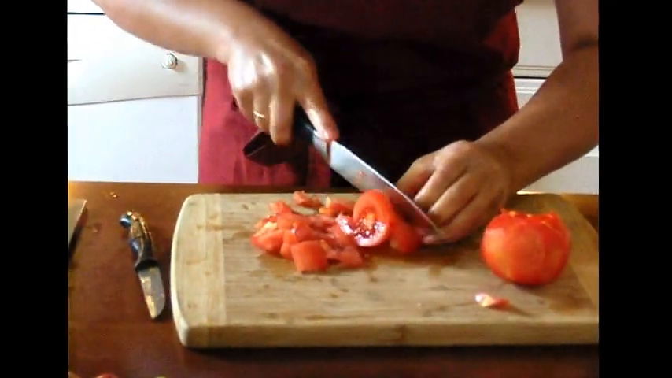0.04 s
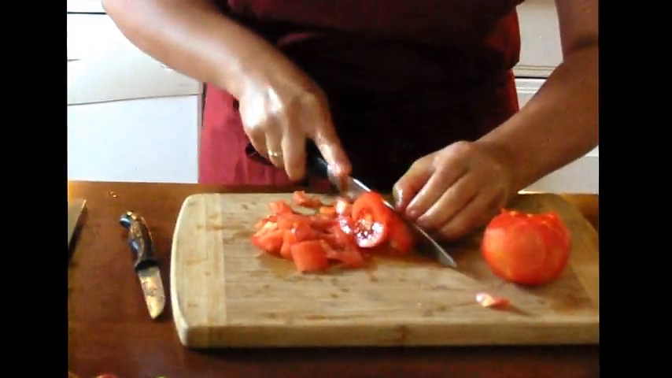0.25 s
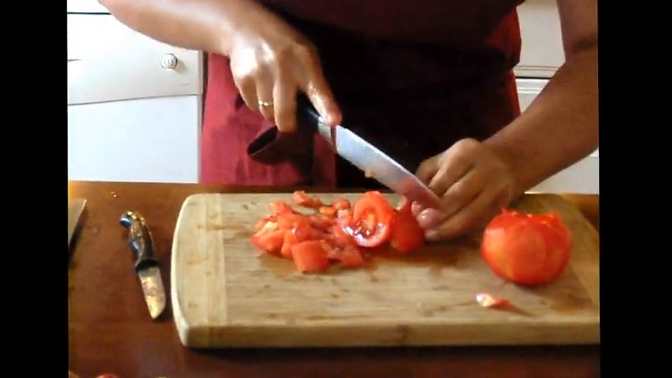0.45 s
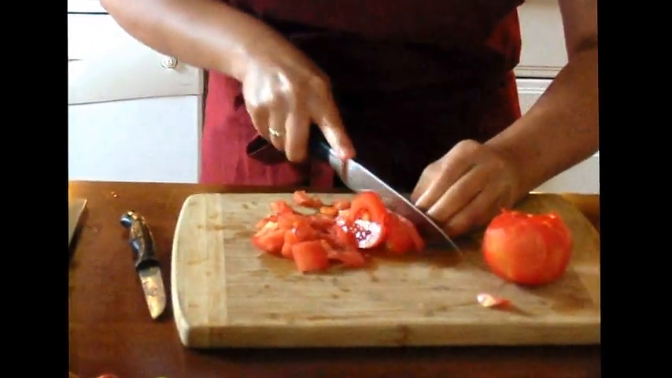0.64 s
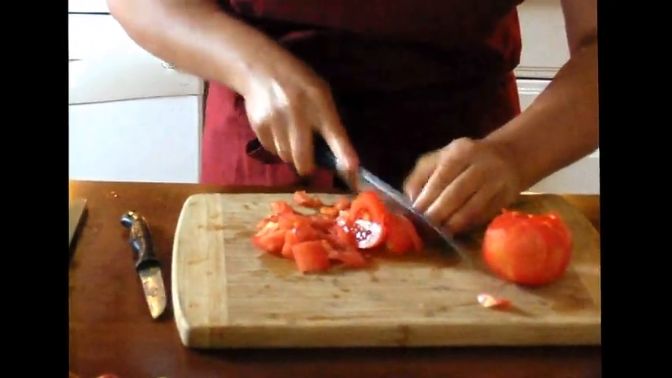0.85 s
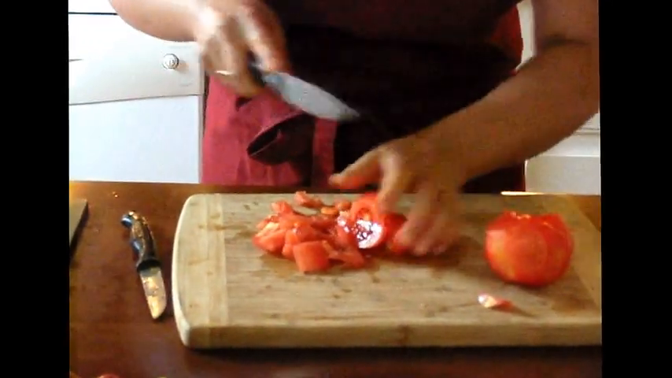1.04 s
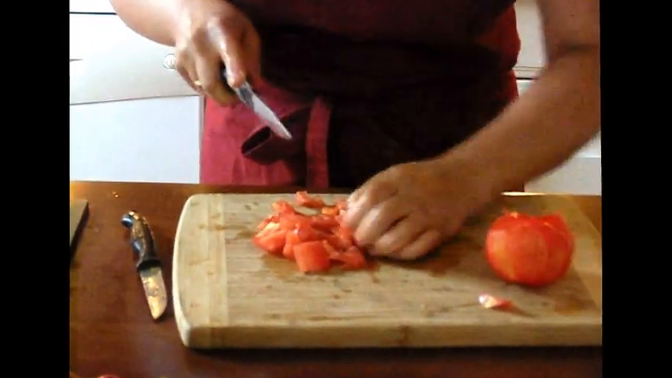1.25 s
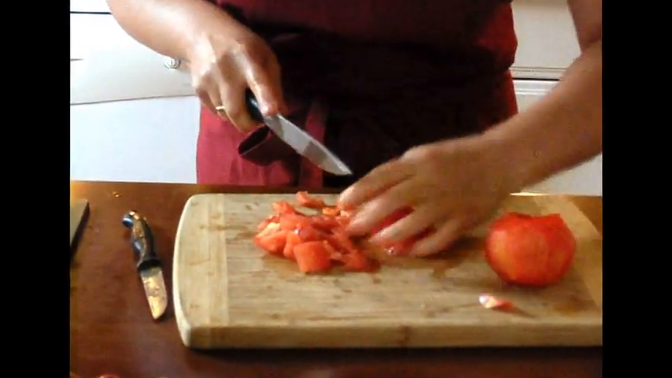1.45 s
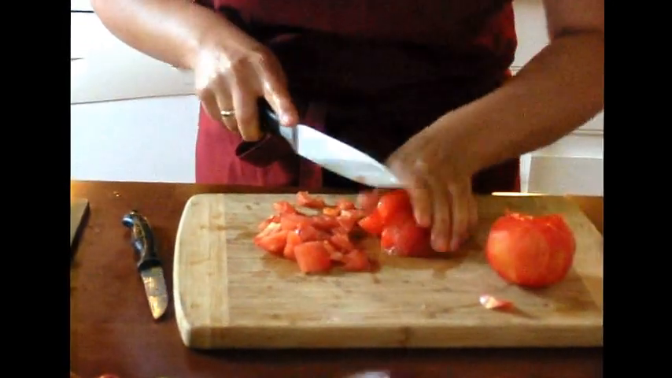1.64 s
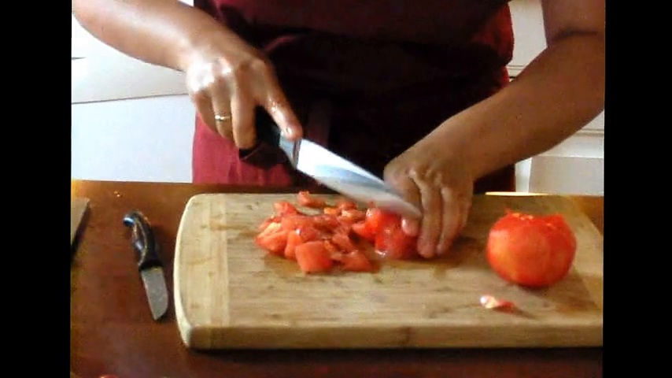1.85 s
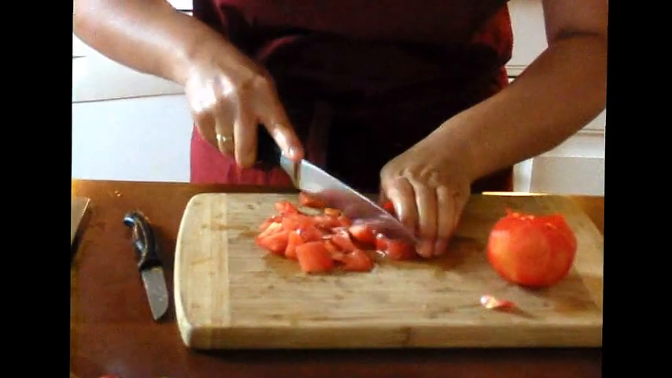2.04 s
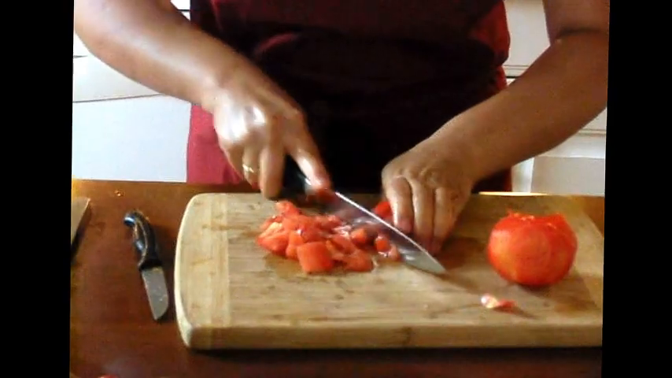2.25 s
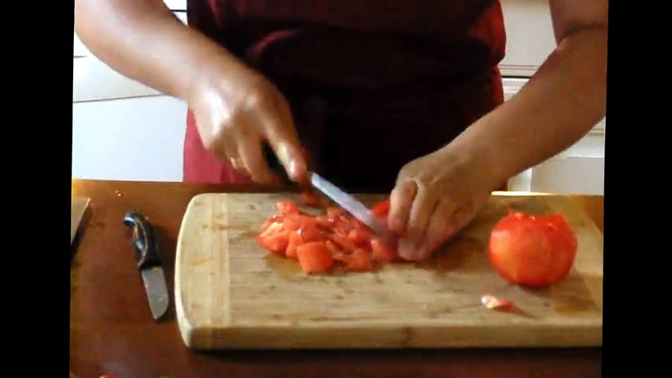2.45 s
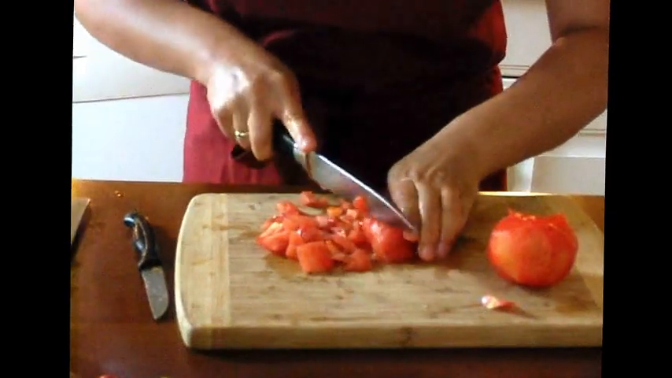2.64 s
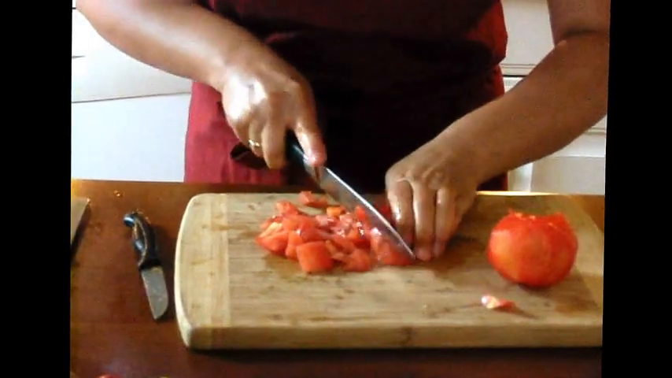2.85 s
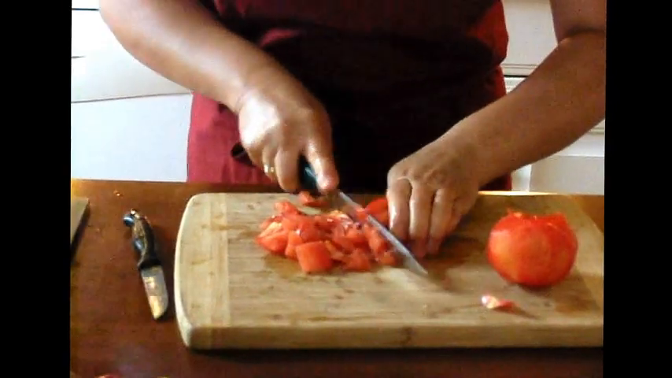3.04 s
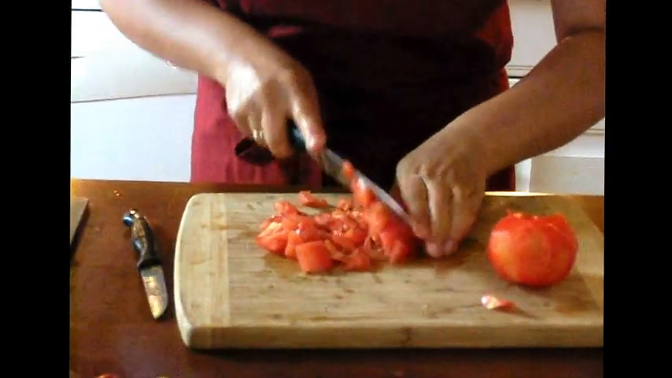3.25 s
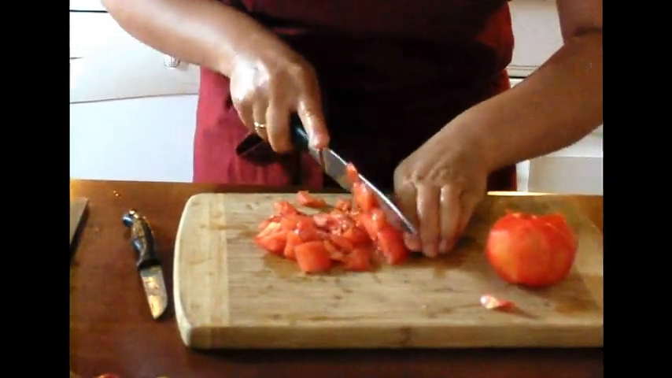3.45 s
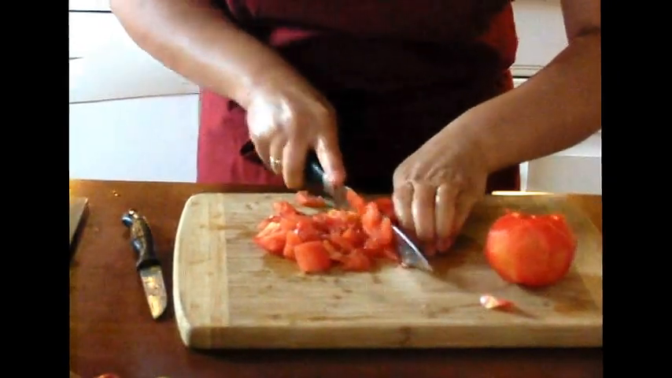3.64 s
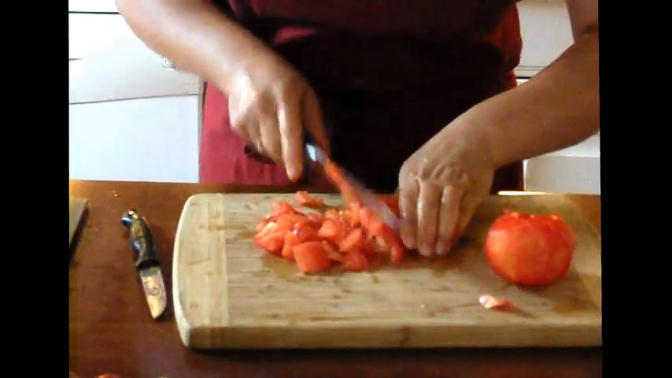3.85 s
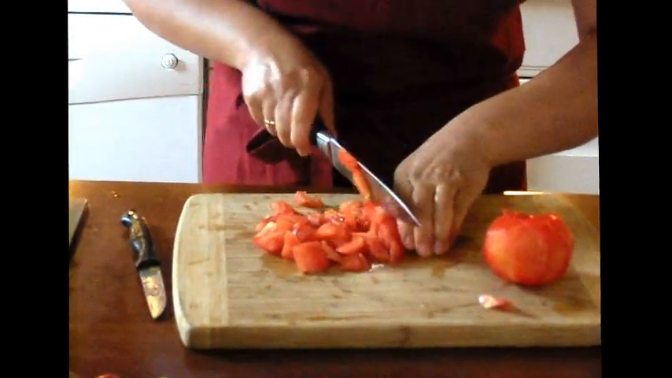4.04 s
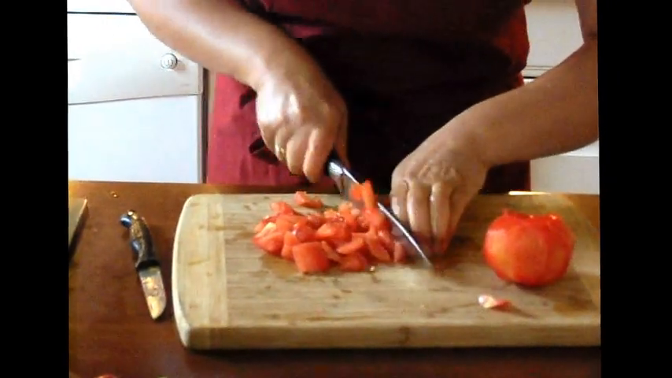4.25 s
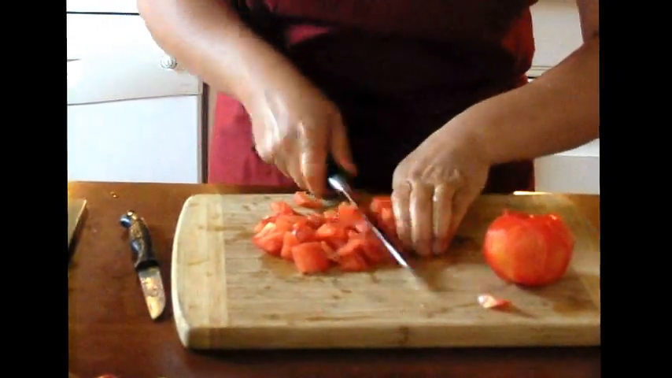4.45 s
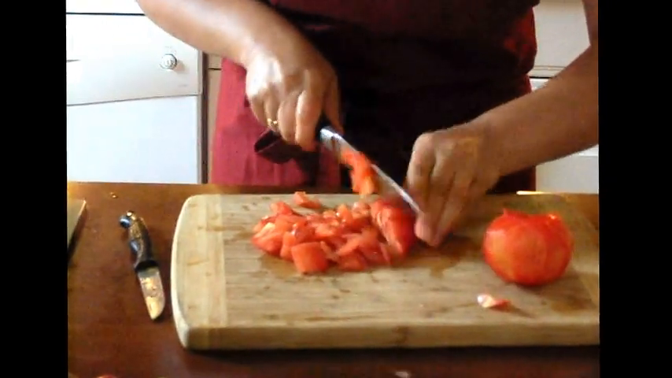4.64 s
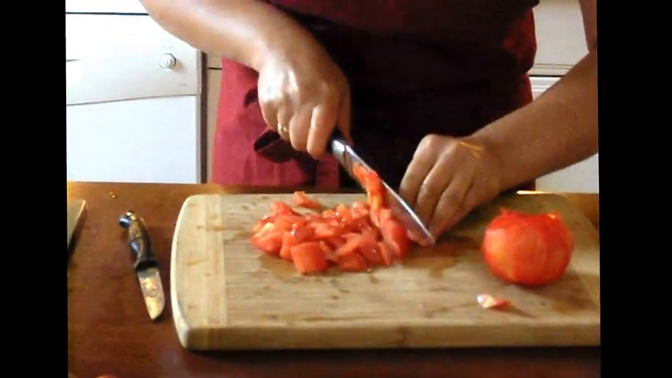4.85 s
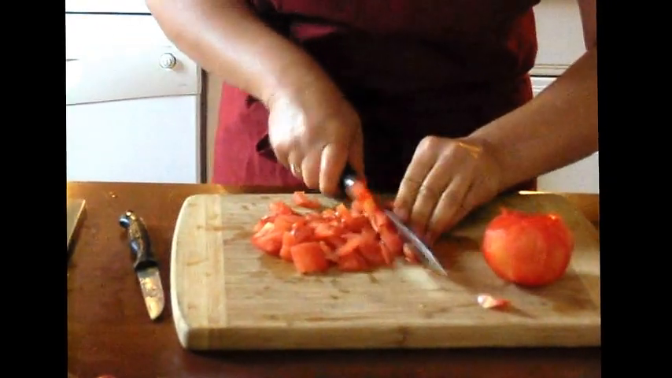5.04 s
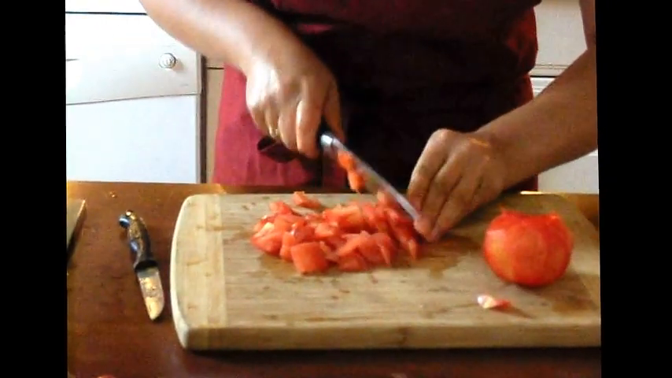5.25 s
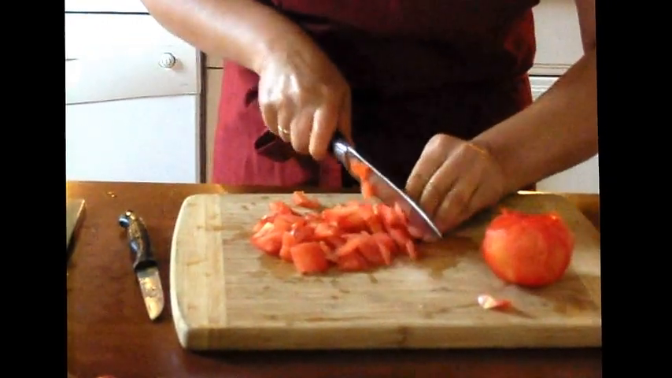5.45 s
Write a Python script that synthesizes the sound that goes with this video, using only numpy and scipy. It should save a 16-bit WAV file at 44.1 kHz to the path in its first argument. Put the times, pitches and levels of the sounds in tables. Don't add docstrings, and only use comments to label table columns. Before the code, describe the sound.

A knife dices juicy tomatoes on a thick wooden board, one very loud knock then softer uneven ones, with wet squishes in a ringing kitchen.

```python
import sys
import numpy as np
from scipy import signal
from scipy.fft import rfft, irfft
from scipy.io import wavfile
from scipy.ndimage import uniform_filter1d

SR = 44100
rng = np.random.default_rng(int(sys.argv[2]) if len(sys.argv) > 2 else 0)


def master(y):
    cut = np.clip(np.atleast_2d(y).T, -1, 1)
    pcm = np.round(cut * 32767)
    wavfile.write(sys.argv[1], SR, pcm.astype(np.int16))


def amplitude_ratio(level_db):
    exponent = np.asarray(level_db, float) / 20
    return 10 ** exponent


N = 242682

# (time [s], peak [dB], contact [ms], crack re peak [dB], rattle re peak [dB])
KNOCKS = [
    (0.2231, 0.5, 0.21, -33, -11),
    (.807, -12.5, 0.3, -26, -22.5),
    (2.329, -22, 0.59, -27, -18),
    (3.0263, -13.5, 0.15, -26, -15),
    (3.7038, -10, 0.39, -21.5, -20.5),
    (4.3893, -27, 0.2, -17, -2),
    (5.0828, -25.5, 0.51, -16, -18),
]


def evened(x):
    return x / np.sqrt(np.mean(x ** 2) + 1e-20)


def read(points, hz):
    f, value = np.transpose(points)
    return np.interp(np.log(hz + 1), np.log(f + 1), value)


def add(mix, s, sound):
    part = mix[round(s * SR):][:len(sound)]
    part += sound[:len(part)]


def colour(x, points):
    gain = amplitude_ratio(read(points, np.fft.rfftfreq(len(x), 1 / SR)))
    return evened(irfft(rfft(x) * gain, len(x)))


def resonate(x, hz, width):
    turn = np.exp(2j * np.pi * np.cumsum(hz * np.ones(len(x))) / SR)
    r = np.exp(-np.pi * width / SR)
    return evened((turn * signal.lfilter([1], [1, -2 * r, r * r], x / turn)).real)


def ring(modes, contact_ms, spread_ms=0.94):
    t = np.arange(3000)[:, None] / SR
    hz, width, db = np.transpose(modes)
    width = np.maximum(width, .06 * hz)
    sign = (-1) ** np.arange(len(hz))
    decay = np.exp(-np.pi * width * t)
    free = (sign * amplitude_ratio(db) * width / hz * decay * np.sin(2 * np.pi * hz * t)).sum(axis=1)
    free *= 1 - np.exp(-(t[:, 0] / (spread_ms / 1000)) ** 2)
    push = np.sin(np.pi * np.clip(t[:200, 0] / (contact_ms / 1000), 0, 1)) ** 2
    sound = np.diff(np.convolve(free, push)[:len(t)], prepend=0)
    return sound / abs(sound).max()


def board():
    # (frequency [Hz], width [Hz], level [dB])
    far_end = [(192, 55, -16), (400, 210, -15.5), (546, 240, -4.5), (781, 19, -0.5), (907, 130, -4.5),
               (1500, 190, -1.5), (1870, 120, -8.5), (1990, 170, -1.5), (2503, 150, -2.5), (2930, 160, -2),
               (3413, 240, -3.5), (3900, 470, -6.5), (4740, 600, -13), (6150, 920, -31.5)]
    near_end = [(398, 68, -9.5), (540, 550, -9), (678, 106, 3), (1170, 67, -13), (1330, 67, -8.5),
                (1787, 240, -3), (2440, 150, -10.5), (2730, 730, -11), (3420, 590, -12)]
    middle = [(400, 50, -6.5), (623, 180, 0), (720, 125, 7.5), (1282, 150, -5.5), (1570, 510, 0),
              (2610, 260, -18.5)]
    centre = [(415, 270, -4.5), (644, 110, 3.5), (754, 98, 9), (1330, 210, 2), (1585, 110, 2.5),
              (1900, 1000, 9), (2770, 370, 2.5)]
    cushioned = [(450, 110, -6), (576, 500, -3), (741, 150, 2.5), (1390, 430, -8), (2760, 250, -6.5)]
    places = [far_end, near_end, middle, middle, centre, cushioned, cushioned]
    # (frequency [Hz], density [dB per Hz])
    crack_spectrum = [(1500, -41.5), (3200, -0.5), (6000, -12), (9000, -25.5), (15000, -26.5)]
    # (frequency [Hz], density [dB per Hz])
    rattle_spectrum = [(700, -13.5), (1150, -21), (1600, -8.5), (3200, -5), (4200, -1), (5500, -9.5),
                       (7000, -16), (10000, -35)]
    # (time [s], peak [dB], pitch [Hz], t60 [s])
    lifts = [
        (4.567, -46, 1990, 0.032),
        (5.1861, -49, 2930, 0.03),
    ]
    crack_s, rattle_s = .0006, 0.0044

    out = np.zeros(N)
    t = np.arange(800) / SR
    for (s, db, contact_ms, crack_db, rattle_db), modes in zip(KNOCKS, places):
        add(out, s, amplitude_ratio(db) * ring(modes, contact_ms))
        crack = colour(rng.standard_normal(len(t)), crack_spectrum) * t / .0003 * np.exp(-t / crack_s)
        add(out, s, amplitude_ratio(db + crack_db) * crack)
        rattle = colour(rng.standard_normal(len(t)), rattle_spectrum)
        rattle = rattle * t / rattle_s * np.exp(-2 * t / rattle_s)
        add(out, s, amplitude_ratio(db + rattle_db) * rattle)
    for s, db, hz, t60 in lifts:
        add(out, s, amplitude_ratio(db) * ring([(hz, 1.7 / t60, 0)], contact_ms=0.19))
    return out


def contacts():
    # (bite [s], hardest [s], bite level [dB], hardest level [dB], landing level [dB])
    cuts = [
        (0.106, 0.207, -77.5, -46.5, -35.5),
        (0.716, 0.8, -68, -55.5, -37.5),
        (2.23, 2.29, -62, -55.5, -45.5),
        (2.924, 2.968, -65, -50.5, -48.5),
        (3.576, 3.65, -56, -50, -48.5),
        (4.244, 4.308, -60, -48, -54),
        (4.925, 5.008, -65, -48, -55),
    ]
    # (whistle [Hz], whistle re hiss [dB], rub re hiss [dB])
    wet_slits = [(7300, -22.5, -1.5), (7700, -12, -1), (8200, -12, -1.5), (7060, -6, -1), (6960, -5, -4),
                 (7650, -22, 0), (5600, 2.5, 1)]
    # (start [s], length [s], hiss [dB], rub re hiss [dB])
    drags = [
        (0.22, 0.054, -48, 2),
        (0.8, 0.051, -54, 5.5),
        (2.335, 0.047, -53.5, 8.5),
        (3.025, 0.1, -66.5, 18.5),
        (3.715, 0.06, -59, -10),
        (4.389, 0.12, -64.5, 16),
        (5.073, 0.088, -58, 9),
    ]
    # (peak [s], rise [s], fall [s], hiss [dB], rub re hiss [dB])
    smears = [(.63, 0.036, 0.021, -66, -5.5), (.678, .04, 0.025, -63, 3), (1.318, 0.067, .15, -67, 4.5),
              (2.112, .035, .008, -67, 2.5), (2.2, 0.075, .02, -68, 3), (2.494, 0.042, 0.015, -55.5, 4.5),
              (2.89, 0.058, 0.059, -60.5, 1.5), (3.165, .06, .02, -64, 6),
              (3.214, 0.016, 0.036, -55.5, 4.5), (3.873, .024, 0.018, -57, 11.5),
              (4.566, 0.014, 0.035, -61.5, 10), (5.226, .04, 0.022, -58, 4.5)]
    bite_hz, land_hz = 8900, 6800
    sag_db = 6.5
    bite_rub_db, land_rub_db = 1, 4
    drag_fade_db, smear_edge_db = -11, -14.5
    smear_hz, smear_whistle_db = 6980, -9

    for (bite, hard, *db), (hz, wet_db, rub_db), knock in zip(cuts, wet_slits, KNOCKS):
        rub = (rub_db + bite_rub_db, rub_db, rub_db + land_rub_db)
        whistle_hz = (bite_hz, hz, min(hz, land_hz))
        whistle_db = (wet_db - sag_db, wet_db, wet_db - sag_db)
        yield (bite, hard, knock[0]), db, rub, whistle_hz, whistle_db
    for s, length, db, rub_db in drags:
        yield (s, s + length), (db, db + drag_fade_db), (rub_db,) * 2, (smear_hz,) * 2, (smear_whistle_db,) * 2
    for s, rise, fall, db, rub_db in smears:
        edge_db = db + smear_edge_db
        levels = (edge_db, db, edge_db)
        yield (s - rise, s, s + fall), levels, (rub_db,) * 3, (smear_hz,) * 3, (smear_whistle_db,) * 3


def strokes():
    # (frequency [Hz], density [dB per Hz])
    juice_spectrum = [(1760, -53.5), (3000, 4.5), (3480, -3.5), (3810, 3.5), (5070, 5.5), (6390, 7),
                      (9460, 6), (15600, -2.5), (16000, -25)]
    rub_spectrum = [(290, -5), (500, -5), (786, -4.5), (1120, -10.5), (1620, -7), (1910, -11), (2620, -8.5),
                    (5000, -14), (6500, -58), (11000, -120)]
    bite_s, stop_s = 0.0066, .003

    burst_db = 2.9 * np.minimum(rng.exponential(1, (3, N // 16 + 1)), 5)
    bursts = rng.standard_normal((3, N)) * amplitude_ratio(burst_db).repeat(16, 1)[:, :N]
    clumps_db = 0.57 * evened(uniform_filter1d(rng.standard_normal(N), 250))
    juice = colour(bursts[0], juice_spectrum)
    rub = colour(bursts[1], rub_spectrum)
    out = np.zeros(N)
    for s, *columns in contacts():
        at = np.arange(round(s[0] * SR), round(s[-1] * SR))
        db, rub_db, hz, whistle_db = (np.interp(at / SR, s, c) for c in columns)
        gate = np.clip(np.minimum((at / SR - s[0]) / bite_s, (s[-1] - at / SR) / stop_s), 0, 1)
        wet = juice[at] + amplitude_ratio(whistle_db) * resonate(bursts[2, at], hz, width=1600)
        out[at] += amplitude_ratio(db + clumps_db[at]) * (wet + amplitude_ratio(rub_db) * rub[at]) * gate
    return out


def pops():
    # (time [s], peak [dB], pitch [Hz], snap [dB])
    sticky_pops = [(.6784, -56, 7300, -12), (0.684, -50, 7150, 4), (.7367, -49, 6200, 0),
                   (1.3209, -51, 6090, -4), (2.1094, -64.5, 5160, -6.5), (2.1635, -57, 6660, -6),
                   (2.2563, -44, 9500, -6), (2.2917, -38, 9700, -9), (2.465, -46, 5300, -10),
                   (2.4984, -40, 8280, -12), (2.893, -45, 6900, 0), (3.1976, -42, 5260, 1),
                   (3.2103, -44, 5090, -13), (3.5778, -41, 9880, -8), (3.5944, -36, 9440, -10),
                   (3.6774, -32, 7700, -6), (3.837, -41, 6150, -5), (3.876, -42, 7500, -2),
                   (4.282, -35, 9700, 0), (4.568, -43, 5760, -6), (4.784, -53, 5800, -5),
                   (4.9337, -45, 5980, -4), (4.9696, -46, 6500, -8), (5.174, -38, 6000, -8),
                   (5.1913, -39, 7340, -16), (5.216, -41, 7820, -6), (5.2245, -40, 7760, -6),
                   (5.2324, -43, 5300, -9)]
    # (time [s], peak [dB], pitch [Hz])
    film_ticks = [(.388, -31.5, 6600), (.621, -54, 10500), (.735, -54, 12500), (1.681, -39, 10360),
                  (2.83, -50, 14300), (1.778, -53.5, 14300), (1.8302, -52.5, 9900), (2.5531, -51, 10700),
                  (3.204, -44, 9180), (3.2254, -53, 9310), (3.2909, -44, 12500), (3.8264, -50, 10200),
                  (4.2537, -50, 14800), (4.533, -35, 12200), (4.5384, -59, 9240)]
    pop_cycles, tick_cycles, tick_snap_db = 6, 2.5, -8

    out = np.zeros(N)
    t = np.arange(400) / SR
    rows = [(*p, pop_cycles) for p in sticky_pops]
    rows += [(*p, tick_snap_db, tick_cycles) for p in film_ticks]
    edges = rng.standard_normal((len(rows), len(t) + 2))
    for (s, db, hz, snap_db, cycles), edge in zip(rows, edges):
        tone = np.sin(2 * np.pi * hz * t) * np.exp(-t * hz / cycles)
        snap = amplitude_ratio(snap_db) * (edge[2:] - edge[:-2]) * np.exp(-t / .00035)
        add(out, s, amplitude_ratio(db) * (tone + snap) * (1 - np.exp(-t / 0.0001)))
    return out


def squeaks():
    # (time [s], length [s], frequency [Hz], width [Hz], level [dB])
    swells = [(0.178, 0.11, 2670, 500, -52), (2.25, 0.034, 9650, 1800, -59),
              (2.485, 0.015, 7300, 2200, -48.5), (2.599, 0.0055, 15000, 3500, -58),
              (2.486, 0.028, 3580, 900, -56), (3.59, .025, 9600, 1990, -56),
              (3.592, .012, 14300, 2500, -61), (3.61, 0.13, 1870, 450, -50), (3.68, 0.019, 7340, 1200, -49),
              (3.868, 0.011, 7350, 1500, -62), (4.252, .014, 14800, 2500, -52),
              (4.56, .012, 10500, 2000, -62), (4.562, 0.12, 2000, 450, -61),
              (3.204, 0.029, 9500, 1500, -62), (4.958, 0.035, 14000, 2500, -54),
              (5.216, 0.015, 14300, 3000, -66), (5.22, 0.053, 2203, 150, -56),
              (5.283, 0.044, 2183, 150, -65.5), (5.348, 0.0274, 2220, 150, -65.5)]
    stick_slip_width_hz, tone_db = 260, 1.5

    out = np.zeros(N)
    for (s, length, hz, width, db), air in zip(swells, rng.standard_normal((len(swells), 6000))):
        swell = signal.windows.tukey(round(length * SR), .5)
        tone = amplitude_ratio(tone_db) * np.sin(2 * np.pi * hz * np.arange(len(swell)) / SR)
        tone = (width < stick_slip_width_hz) * tone
        add(out, s, amplitude_ratio(db) * swell * (resonate(air, hz, width)[:len(swell)] + tone))
    return out


def kitchen(x):
    # (frequency [Hz], t60 [s])
    decay_times = [(250, 0.89), (700, 0.49), (1700, 0.68), (3500, 0.59), (6000, 0.63), (12000, 0.38)]
    # (delay [s], level [dB])
    echoes = [
        (.0035, -11),
        (.0125, -24),
        (.016, -18.5),
    ]
    tail_db, rise_s = -2.5, 0.0026

    taps = rng.choice([-1., 1.], SR) * (rng.random(SR) < .15)
    hz, t, z = signal.stft(taps, SR, nperseg=256)
    tail = signal.istft(z * amplitude_ratio(-60 * t / read(decay_times, hz)[:, None]), SR, nperseg=256)[1]
    tail *= 1 - np.exp(-(np.arange(len(tail)) / SR / rise_s) ** 2)
    tail *= amplitude_ratio(tail_db) / np.linalg.norm(tail[:SR // 10])
    tail[0] = 1
    for k, (s, db) in enumerate(echoes):
        tail[round(s * SR)] += (-1) ** k * amplitude_ratio(db)
    return signal.fftconvolve(x, tail)[:N]


def hum():
    # (frequency [Hz], density [dB per Hz])
    noise_spectrum = [(8.8, -25.5), (15, 1.5), (70, -5.5), (134, -7.5), (269, -12), (294, -13.5),
                      (748, -22), (944, -25), (1380, -30.5), (1640, -31.5), (2080, -34.5), (3220, -38.5),
                      (6290, -45.5), (10300, -47.5), (16000, -50.5)]
    noise = amplitude_ratio(-44.5) * colour(rng.standard_normal(N), noise_spectrum)
    whine = amplitude_ratio(-87) * resonate(rng.standard_normal(N), hz=7850, width=200)
    return noise + whine


def scene():
    near = pops() + squeaks()
    return (kitchen(board() + strokes() + .5 * near) + .5 * near + hum())[None]


def top_cut(x):
    return signal.sosfilt(signal.butter(12, 16480, fs=SR, output="sos"), x)


def record(dry):
    ceiling, edge_hz = 1.1, 15840
    over = np.maximum(abs(dry) - ceiling / 2, 0)
    rounded = dry - np.sign(dry) * (over - ceiling / 2 * np.tanh(2 * over / ceiling))
    lowpass = signal.firwin(1023, edge_hz, window=("kaiser", 9), fs=SR)
    limited = signal.oaconvolve(rounded, lowpass[None], "same")
    return top_cut(limited)


dry = scene()
out = record(dry)
master(out)
```